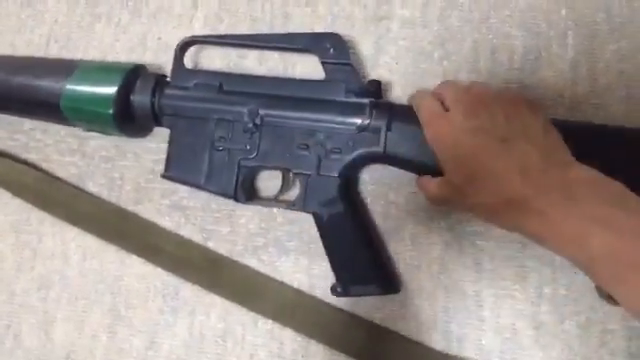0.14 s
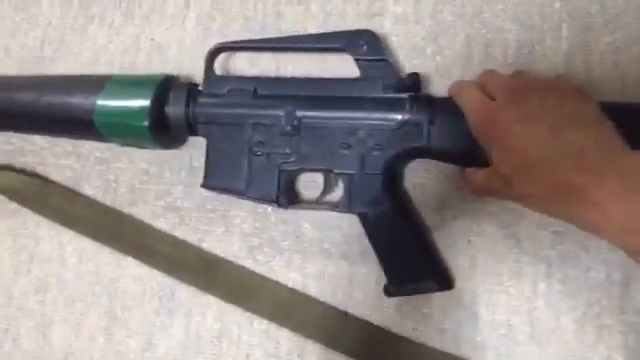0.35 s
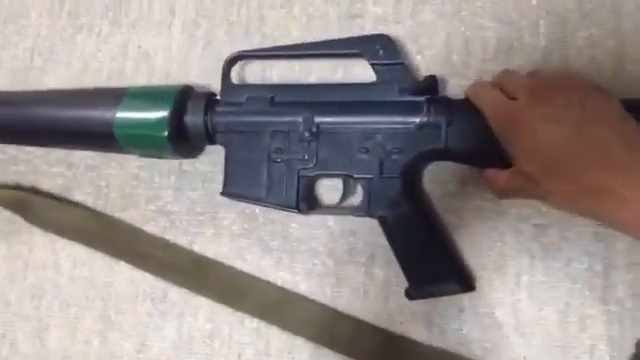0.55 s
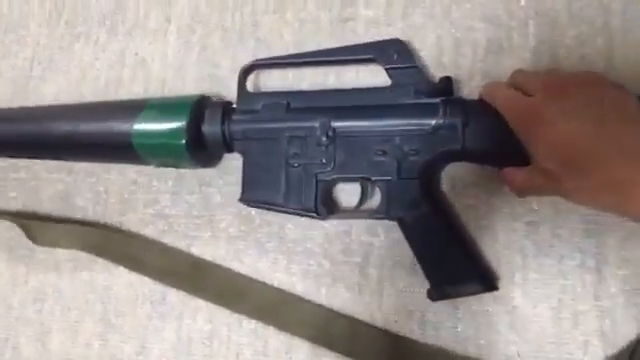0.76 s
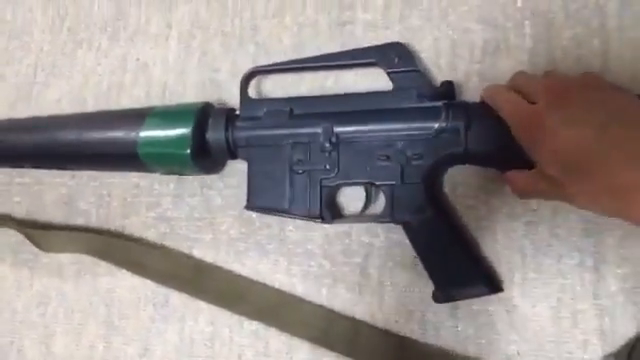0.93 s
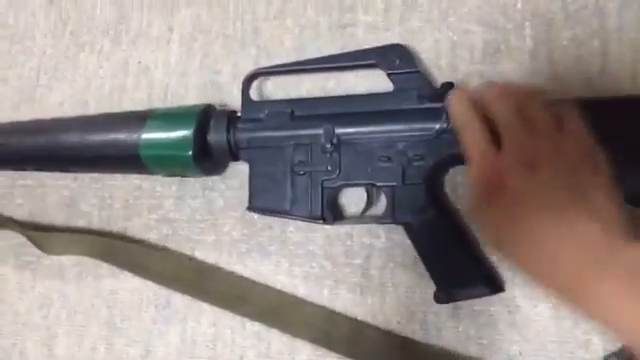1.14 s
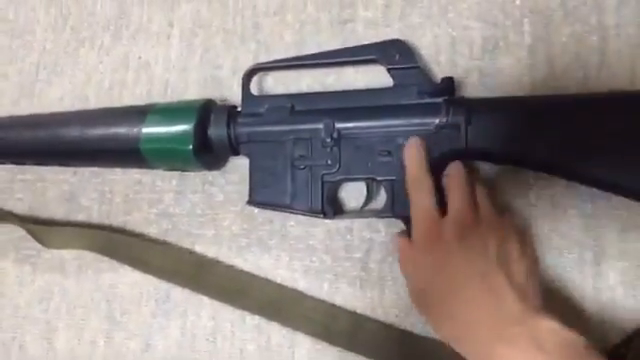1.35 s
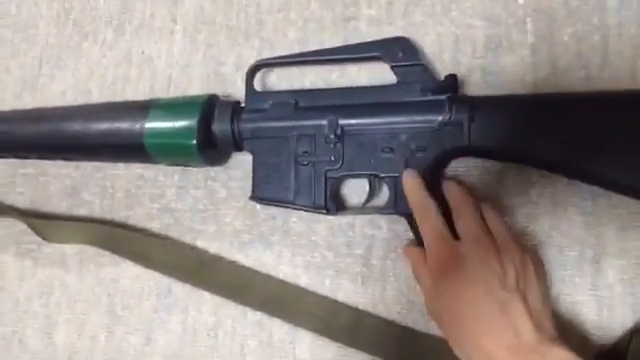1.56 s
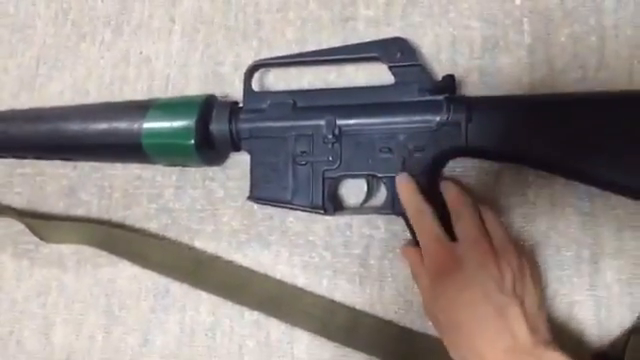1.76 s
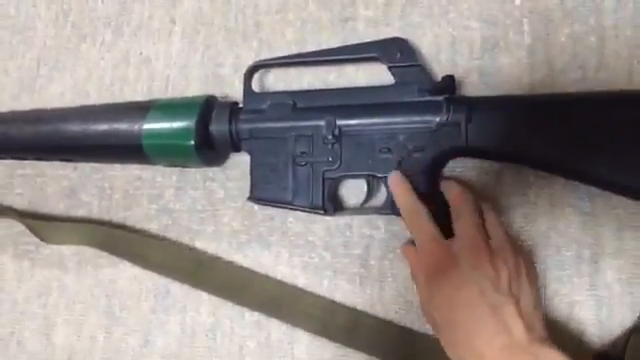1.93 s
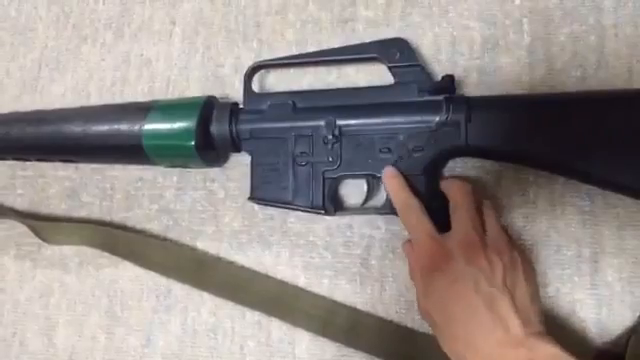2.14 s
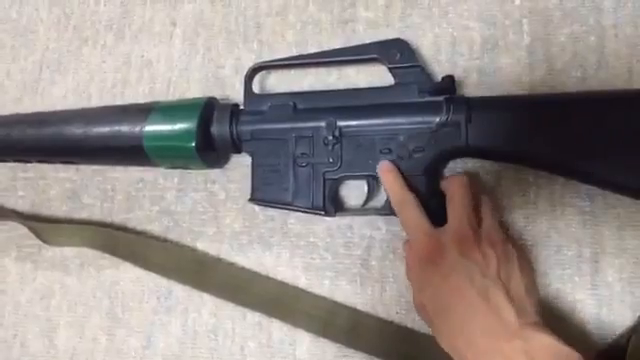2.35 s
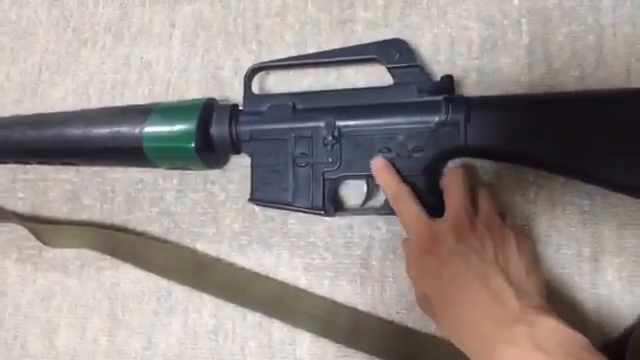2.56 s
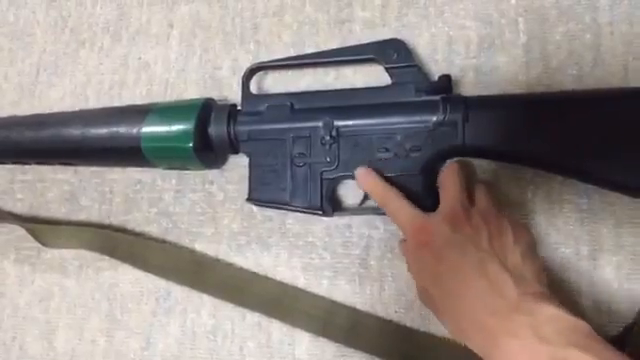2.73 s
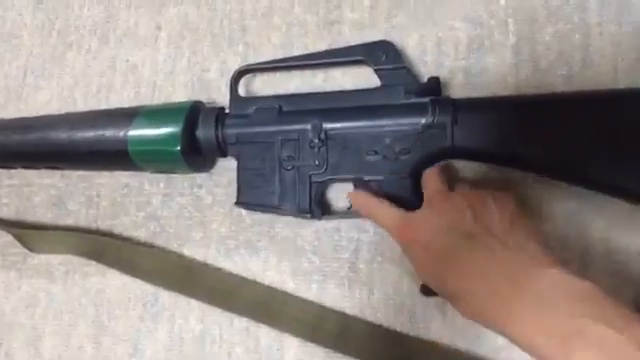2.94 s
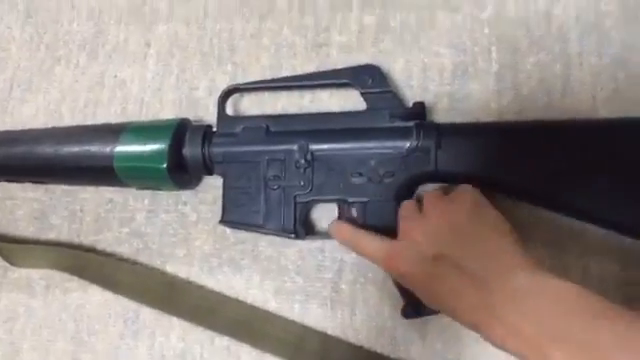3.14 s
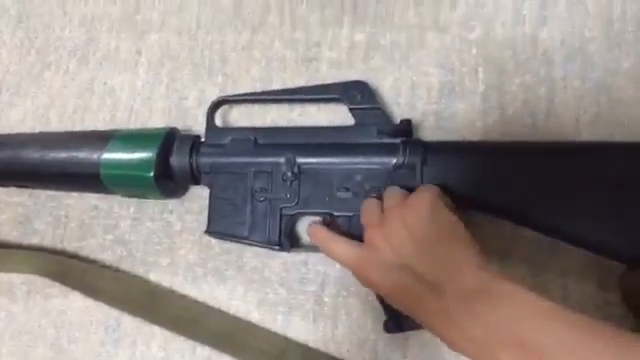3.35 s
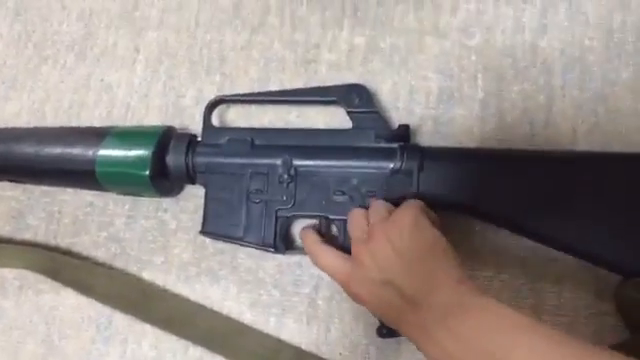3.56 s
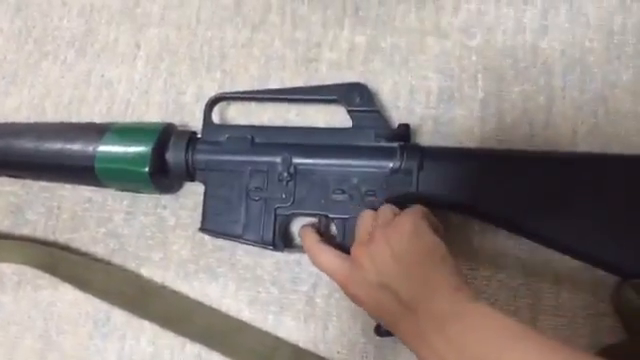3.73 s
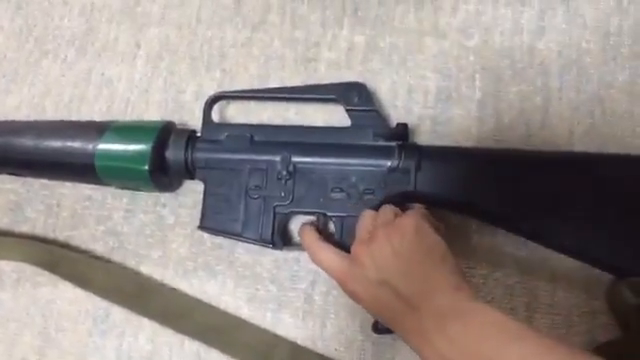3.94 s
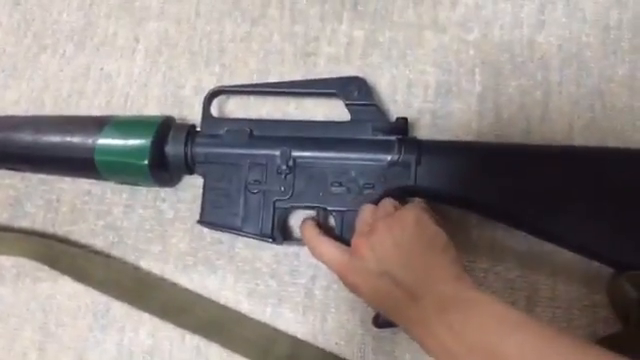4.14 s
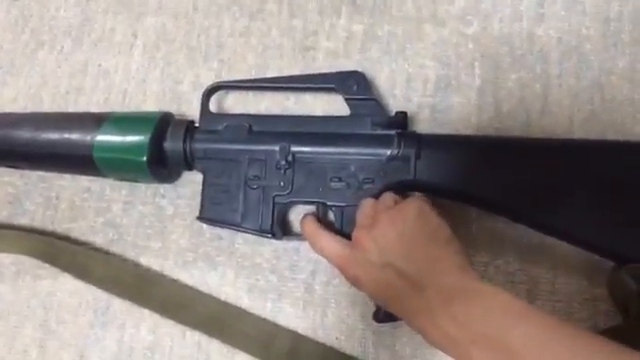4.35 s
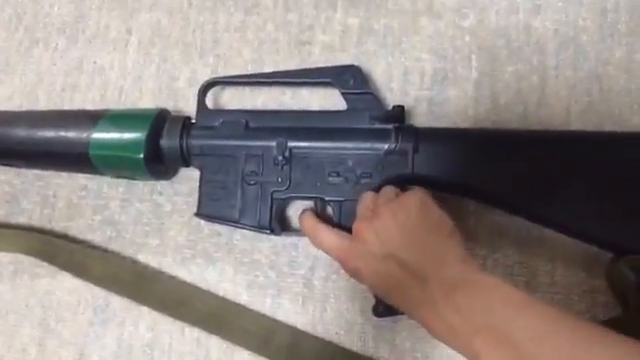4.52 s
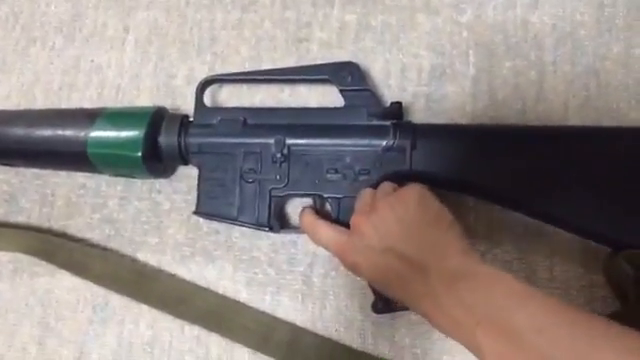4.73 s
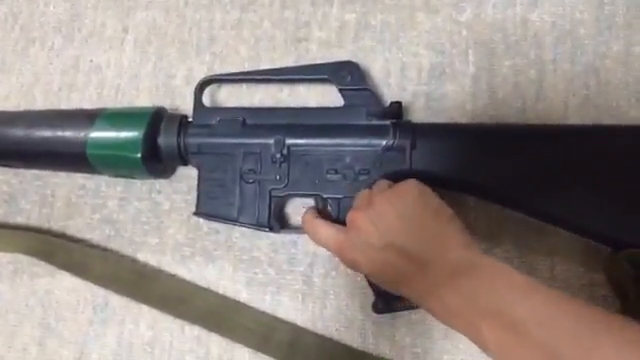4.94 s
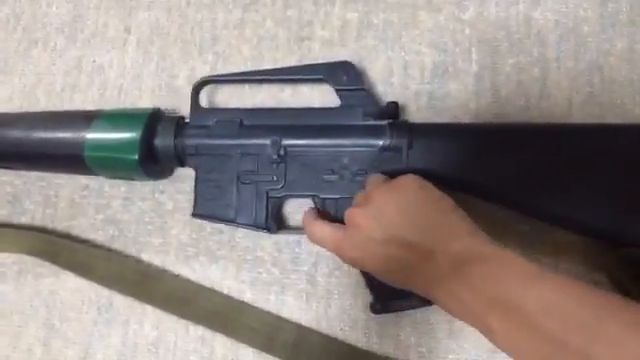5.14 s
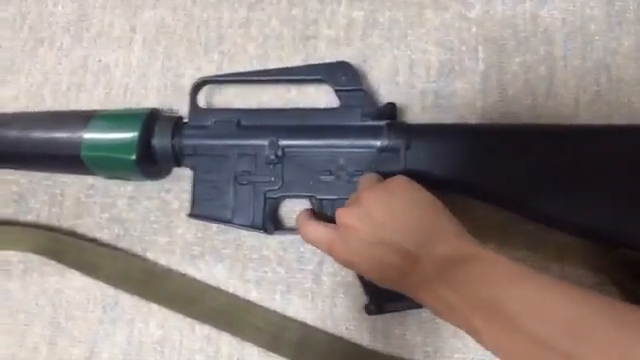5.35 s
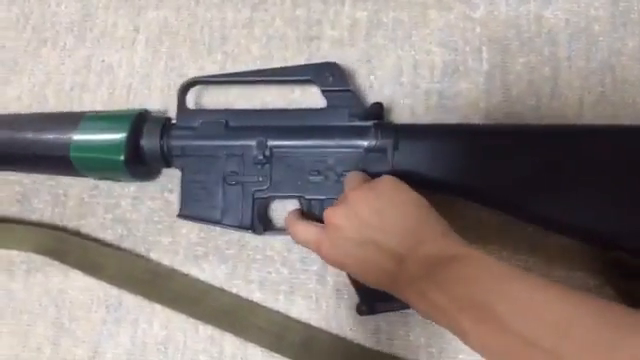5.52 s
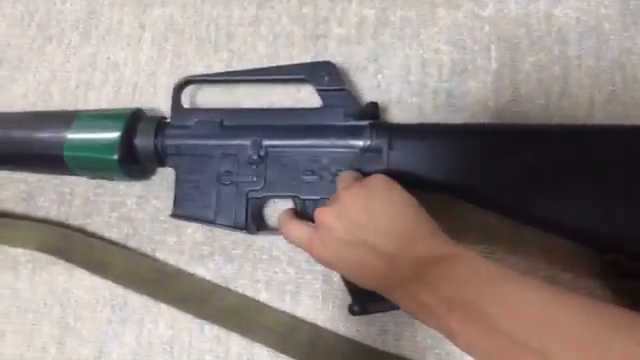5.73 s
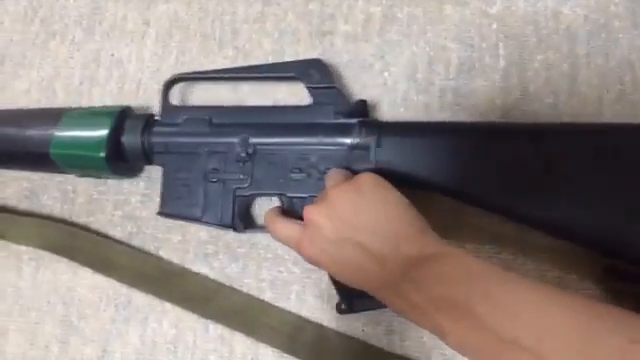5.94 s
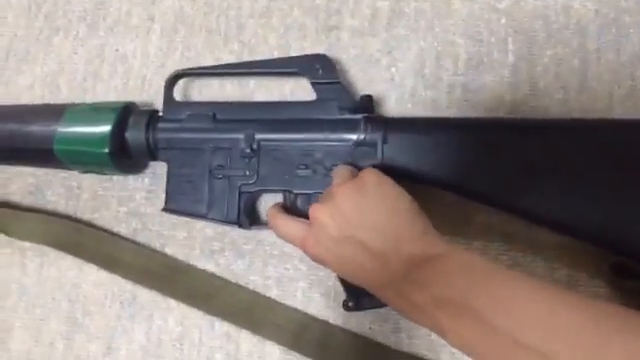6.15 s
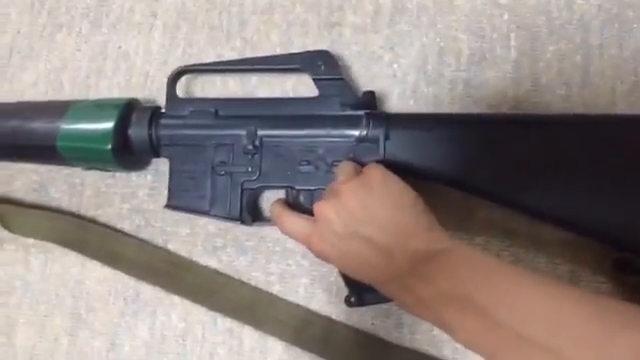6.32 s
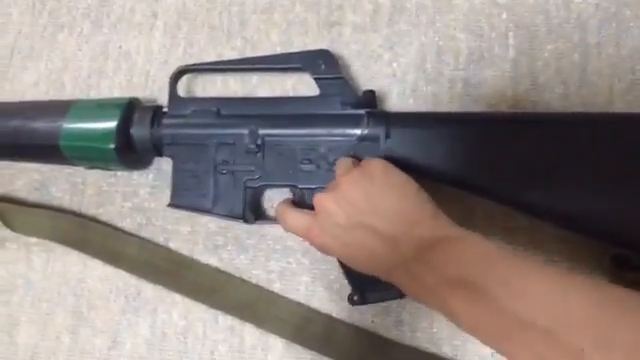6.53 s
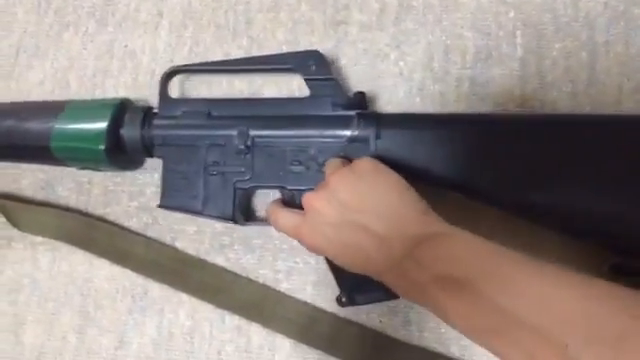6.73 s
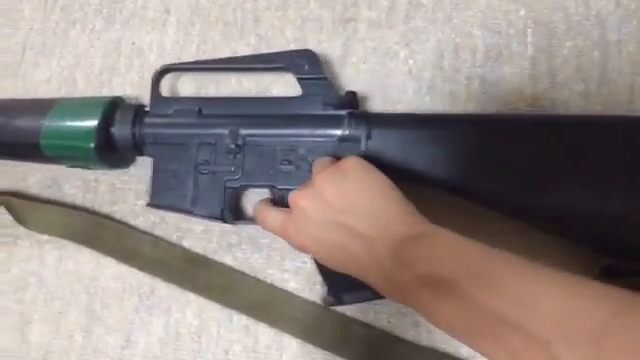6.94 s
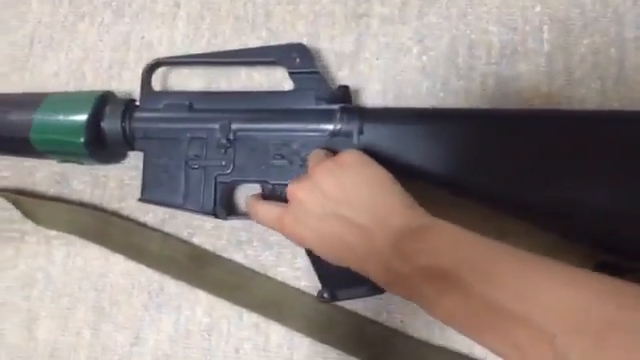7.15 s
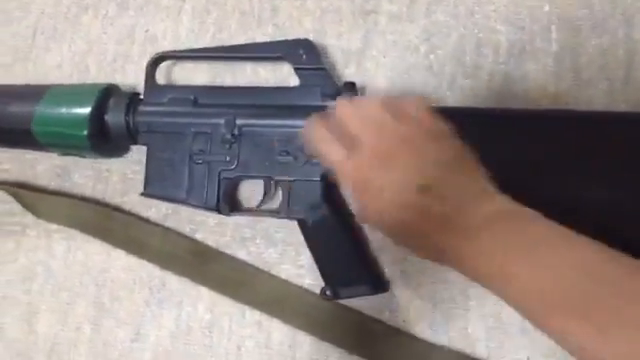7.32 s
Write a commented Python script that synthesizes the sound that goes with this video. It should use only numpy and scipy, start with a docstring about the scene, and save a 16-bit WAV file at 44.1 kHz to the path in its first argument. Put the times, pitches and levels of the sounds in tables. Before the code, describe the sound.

Close by in a small room, a soft rustle and a few light taps come from an airsoft rifle being moved on a rug. A crisp selector click follows, then quiet handling. Two loud full-auto bursts come near the end, a fast mechanical clatter with grinding gears, motor whine and low thumps, split by a short pause in which the spring rings thinly. An appliance hums faintly throughout.

```python
"""First comes a soft rustle: a hand slides an electric airsoft rifle over a rug in a small room.
Fingers tap and brush it, the selector and trigger click, and it fires two bursts, 17 shots a second.
In each firing cycle the piston slams home, the gears knock into a recoil weight, metal clacks and
the motor whines under the load of the spring, which sings on after each burst.
An appliance hums faintly throughout."""
import sys
import numpy as np
from scipy import signal
from scipy.fft import rfft, irfft
from scipy.io import wavfile
from scipy.ndimage import uniform_filter1d

SR = 44100
rng = np.random.default_rng(int(sys.argv[2]) if len(sys.argv) > 2 else 0)


def dump(signal):
    """Clip the signal to [-1, 1] and save it as 16-bit WAV at the path in sys.argv[1]."""
    limited = np.clip(np.atleast_2d(signal).T, -1, 1)
    pcm = np.round(limited * 32767).astype(np.int16)
    wavfile.write(sys.argv[1], SR, pcm)


N = 329868
TIME = np.arange(N) / SR
AGE = TIME[:SR // 4]   # seconds since a blow

# Levels are relative: the functions add their own gains. t60 is the time a sound takes to fade by 60 dB.
# the rifle sliding over the rug: t/s, rub level/dB, rumble level/dB
SLIDE_LEVELS = [(0.0, -68, -61), (0.066, -69, -49), (0.102, -65, -94), (0.126, -60.5, -70),
                (0.296, -53, -42.5), (0.462, -55, -46.5), (0.506, -59, -58), (0.758, -58, -54.5),
                (0.97, -69.5, -77)]
# noise colours (how strong each pitch is) of the rub, the rumble and the room's air: f/Hz, level/dB
RUG_COLOUR = [(180, -36), (300, -7.5), (553, -8.5), (579, -10), (682, 1.5), (1040, -3.5), (1240, 1.5),
              (2900, -9.5), (7770, -12.5), (10600, -20), (13800, -54), (22000, -120)]
RUMBLE_COLOUR = [(15, -44), (25, -42), (48, -1.5), (70, 1), (120, -7.5), (195, -9), (290, -39), (350, -26),
                 (460, -57), (770, -120)]
AIR_COLOUR = [(15, -39.5), (25, -10), (76, 2), (277, -11), (323, -10), (484, -15.5), (578, -8),
              (623, -14.5), (726, -17), (1440, -19.5), (3070, -25.5), (7840, -28), (10600, -31.5),
              (13800, -64), (22000, -120)]
# an appliance humming: f/Hz, level/dB
HUM_TONES = [(585.5, -72.5), (545, -86)]
# fingers tapping the rifle: t/s, level/dB, added treble/dB, added hollow knock/dB
FINGER_TAPS = [(0.055, -44.5, -28, -0.5), (0.981, -43, -31, -13), (1.044, -35.5, -8.5, -10),
               (1.093, -48.5, -21, -3.5), (1.116, -40.5, -19, -10), (1.272, -54.5, 5.5, -21),
               (1.419, -55, 5, -21), (3.392, -47, -37, -4), (4.988, -31, -23.5, -26),
               (7.423, -36.5, -19, -12.5)]
# the hand brushing stock and grip: middle t/s, length/s, level/dB, added treble/dB
HAND_BRUSHES = [(1.034, 0.081, -59, -9), (1.119, 0.081, -60.5, -10), (1.287, 0.041, -72, 2),
                (1.463, 0.45, -76.5, 6), (2.95, 0.27, -74, -16), (3.266, 0.072, -68.5, -9),
                (4.933, 0.024, -64, -10), (6.51, 0.61, -62.5, -8.5)]
# a small metal fitting chinking: t/s, level/dB
FITTING_CHINKS = [(1.092, -71), (1.112, -64)]
# the selector leaving one notch and dropping into the next: t/s, level/dB, tail against the snap/dB
SELECTOR_SNAPS = [(2.4049, -17.5, -23), (2.4233, -21, -31)]
# noise colours of a tap and of the selector: f/Hz, level/dB
TAP_COLOUR = [(100, -3), (400, -16), (800, -10.5), (1300, 4), (2200, -2), (4000, -9.5), (7000, -7),
              (10500, -20.5)]
SELECTOR_COLOUR = [(120, -32), (450, -36), (900, -27), (1600, -37), (1950, -7), (2800, -16), (3200, -4.5),
                   (4400, -7), (5300, 0.5), (7000, -1.5), (9000, -7), (10600, -7.5)]
# modes (natural ringing tones) of the hollow plastic, the fitting and the trigger: f/Hz, level/dB, t60/s
HOLLOW_MODES = [(180, -11.5, 0.057), (379.8, -13.5, 0.027), (574, 0, 0.028), (824, -2, 0.02),
                (991, -0.5, 0.027), (1290, -5.5, 0.045)]
CHINK_MODES = [(5020, 3, 0.1), (5360, -4, 0.18), (10100, -10, .1)]
TRIGGER_MODES = [(1290, 0, .03), (1750, -2, .018), (2480, -5, .035), (2900, -6, .016), (3550, -9, .022)]
# the bursts: motor start t/s, first shot t/s, second shot t/s, first full-speed shot t/s, last shot t/s,
# motor at rest t/s, starting surge/dB, shot body/dB, shot crack/dB, clack/dB, singing spring/dB
BURSTS = [(5.0771, 5.129, 5.1961, 5.259, 6.0257, 6.10, 4.5, -12, -14, -15, 3.5),
          (6.585, 6.6066, 6.672, 6.7407, 7.215, 7.28, -1, -14, -16.5, -14.5, -11)]
# the spring loading the gears (last row: running free): t/s since a shot, tooth f/Hz, whine/dB, grind/dB
GEAR_LOAD = [(0, 3278, -16, -2), (.018, 3640, -6, 0.5), (.032, 3537, -3.5, 1), (.042, 3228, 0, 1),
             (.049, 3099, 1.5, 0.5), (.056, 3027, -5, -3), (.09, 3662, 5, -2)]
# the low thump through the bursts: t/s, level/dB
THUMP_LEVELS = [(5.13, -31), (5.2, -17.5), (5.32, -18.5), (5.5, -25), (5.67, -21.5), (5.735, -8.5),
                (5.91, -28.5), (6.03, -16), (6.61, -21.5), (6.93, -18), (7.1, -39), (7.22, -26)]
# noise colours of the gears, a shot and a clack: f/Hz, level/dB
GEAR_COLOUR = [(120, -13.5), (250, -3), (450, -4.5), (700, -4), (1050, 1), (1500, -0.5), (2100, -1),
               (3200, -1), (4500, -4), (7000, -3.5), (8500, -6.5), (10300, -10.5)]
SHOT_COLOUR = [(120, -10.9), (250, -6), (450, 1.2), (700, 1.7), (1050, 6.5), (1500, -9.5), (2100, -1.5),
               (3200, -8), (4500, -7), (7000, -6.5), (8500, -10), (10300, -21.5)]
CLACK_COLOUR = [(120, -5.5), (250, -11), (450, -11), (700, -3), (1050, 2.1), (1500, -0.5), (2100, -1),
                (3200, -3), (4500, -6.5), (7000, -1), (8500, -4), (10300, -10.5)]
# modes of the rifle's frame under the piston, the weight and the clack: f/Hz, level/dB, t60/s
SHOT_MODES = [(178.4, -17.5, 0.23), (260, -10, .03), (333, -10, .06), (420.4, -8, 0.058), (491, 2.5, .01),
              (600, -23, .1), (768, -14, 0.12), (873, 0.5, 0.0095), (1011, -14.5, 0.14), (1080, -7, 0.058),
              (1307, -14.5, .04), (1830, -12.5, .035), (6810, -14.5, .1), (7490, -14, .03)]
KNOCK_MODES = [(183.5, -7.5, 0.18), (578, -15.5, 0.033), (694, 1, 0.17), (980, -6.5, 0.069),
               (1280.5, -5, 0.045), (1855, -4.5, 0.049), (2425, -9.5, 0.17)]
CLACK_MODES = [(689, -4, .04), (1055, -8, 0.036), (1478, -7.5, 0.036), (2129, -12, 0.035),
               (3210, -15.5, 0.028), (3560, -15, .05), (6150, -14, .06), (6860, -7, 0.011),
               (7240, -12.5, .02)]
# the gears jolting as they start or run back against the latch: t/s, body/dB, crack/dB
GEAR_JOLTS = [(6.058, -19, -15), (6.0705, -21, -18), (6.5835, -22, -22.5), (7.2445, -19, -16)]
# the spring ringing on: f/Hz, level/dB, t60/s
SPRING_MODES = [(1063, -46.5, 2.5), (8468, -62.5, 0.92), (8091, -73, 1.0), (9135, -72.5, .9)]
# how fast the room's echo dies: f/Hz, t60/s
ROOM_DECAY = [(100, .15), (500, 0.22), (2000, 0.23), (6000, 0.21), (10500, 0.18)]


def from_db(db):
    """Turn decibels into a factor to multiply by."""
    return 10 ** (np.asarray(db) / 20)


def along(rows, times):
    """Read a table's columns at any times, joining its rows with straight lines."""
    row_times, *columns = np.transpose(rows)
    return [np.interp(times, row_times, column) for column in columns]


def at_hz(points, hz):
    """Read a table at any frequency, on a scale of octaves."""
    row_hz, values = np.transpose(points)
    return np.interp(np.log(hz + 1), np.log(row_hz), values)


def fade(age, t60):
    """Die away by 60 dB every t60 seconds."""
    return np.exp(-np.log(1000) * age / t60)


def add(out, s, sound):
    """Mix a sound in, starting at s seconds."""
    start = max(round(s * SR), 0)
    out[start:start + len(sound)] += sound[:N - start]


def noise(colour, size=N):
    """Noise of a given colour, with an average power of 1."""
    hz = np.arange(size // 2 + 1) * SR / size
    spectrum = rfft(rng.standard_normal(size)) * from_db(at_hz(colour, hz))
    wave = irfft(spectrum, size)
    return wave / np.sqrt(np.mean(wave ** 2) + 1e-20)


def split(x, edge_hz):
    """Split a sound into its low part and its high part."""
    return [signal.sosfilt(signal.butter(2, edge_hz, kind, fs=SR, output="sos"), x)
            for kind in ("low", "high")]


def ring(modes, vary_db, detune):
    """A struck object rings in fading tones, a little different in strength and tuning each time."""
    hz, db, t60 = np.transpose(modes)[:, :, None]
    strength, tuning = rng.standard_normal((2, len(modes), 1))
    signs = (-1) ** np.arange(len(modes))[:, None]
    waves = signs * np.sin(2 * np.pi * hz * (1 + detune * tuning) * AGE)
    return np.sum(from_db(db + vary_db * strength) * fade(AGE, t60) * waves, axis=0)


def rug_slide():
    """The rifle rubs and rumbles over the rug, then comes to rest."""
    rub_db, rumble_db = along(SLIDE_LEVELS, TIME)
    moving = np.clip((SLIDE_LEVELS[-1][0] - TIME) / 0.07, 0, 1)
    rub = from_db(rub_db - 1) * noise(RUG_COLOUR)
    rumble = from_db(rumble_db + 0.5) * noise(RUMBLE_COLOUR)
    return moving * (rub + rumble)


def hum_and_air():
    """An appliance hums over the faint hiss of the room."""
    hum = sum(from_db(db) * np.sqrt(2) * np.sin(2 * np.pi * hz * TIME) for hz, db in HUM_TONES)
    return hum + from_db(-67) * noise(AIR_COLOUR)


def finger_taps():
    """A finger makes a dull tap and a bright tick, and the hollow plastic rings."""
    out = np.zeros(N)
    for s, db, treble_db, knock_db in FINGER_TAPS:
        body, tick = split(noise(TAP_COLOUR, len(AGE)) * fade(AGE, t60=0.026), edge_hz=2500)
        hollow = from_db(knock_db + 6.5) * ring(HOLLOW_MODES, vary_db=5, detune=0.058)
        add(out, s, from_db(db - 11) * (body + hollow - from_db(treble_db + 5.5) * tick))
    return out


def hand_brushes():
    """The hand rubs over the rifle; each stroke swells and fades."""
    out = np.zeros(N)
    dull, bright = split(noise(RUG_COLOUR), edge_hz=2500)
    for s, length_s, db, treble_db in HAND_BRUSHES:
        swell = np.cos(np.pi * np.clip((TIME - s) / length_s, -.5, .5))
        out += from_db(db) * swell * (dull - from_db(treble_db) * bright)
    return out


def fitting_chinks():
    """A small metal fitting rings with a few high tones."""
    out = np.zeros(N)
    for s, db in FITTING_CHINKS:
        add(out, s, from_db(db) * ring(CHINK_MODES, vary_db=2, detune=0.011))
    return out


def selector_clicks():
    """The selector lever jumps between notches: sharp snaps, each with a faint tail."""
    out = np.zeros(N)
    for s, db, tail_db in SELECTOR_SNAPS:
        snap = fade(AGE, t60=0.015) + from_db(tail_db) * fade(AGE, t60=0.1)
        add(out, s, from_db(db - 7.5) * noise(SELECTOR_COLOUR, len(AGE)) * snap)
    return out


def trigger_click(s=4.987):
    """The small steel trigger snaps over and rings just before the first burst."""
    out = np.zeros(N)
    add(out, s, from_db(-43.5) * ring(TRIGGER_MODES, vary_db=2, detune=.005))
    return out


def motor_run(start_speed=.55, spin_up_s=.013, coast_s=.075, surge_s=.037, surge_width_s=.014):
    """The motor's speed (1 is full) and loudness: it labours to wind the spring, runs, then coasts."""
    speed, surge_db = np.zeros(N), np.zeros(N)
    for start_s, _, _, _, _, rest_s, db, *_ in BURSTS:
        age = np.maximum(TIME - start_s, 0)
        rising = (age > 0) * (1 - (1 - start_speed) * np.exp(-age / spin_up_s))
        coasting = np.sqrt(np.clip((rest_s - TIME) / coast_s, 0, 1))
        speed += rising * coasting
        surge_db += db * np.exp(-((age - surge_s) / surge_width_s) ** 2)
    return speed, speed ** 3.2 * from_db(surge_db)


def gears(shots, wobble=0.026, grain_db=1.5):
    """Gear teeth grind and whine; the pitch sags as the spring is wound for the next shot."""
    speed, loudness = motor_run()
    shot_s = np.array(shots)[:, 0]
    latest_shot = np.maximum(np.searchsorted(shot_s, TIME) - 1, 0)
    since_shot = TIME - shot_s[latest_shot]
    since_shot[TIME < shot_s[0]] = GEAR_LOAD[-1][0]   # no shot yet: the load is even
    tooth_hz, whine_db, grind_db = along(GEAR_LOAD, since_shot)
    flutter = [(20, -1), (300, 0.0), (1200, -25.5), (5000, -67.5)]   # f/Hz, level/dB
    phase = 2 * np.pi * np.cumsum(tooth_hz * speed * (1 + wobble * noise(flutter))) / SR
    tones = np.sin(phase) + from_db(-8) * np.sin(2 * phase) + from_db(-9) * np.sin(phase / 2)
    whine = from_db(whine_db - 24.5) * speed ** 2 * tones
    grind = from_db(grind_db - 17.5) * split(noise(GEAR_COLOUR), edge_hz=300)[1]
    grain = from_db(grain_db * noise(flutter))   # no two teeth meet equally hard
    return loudness * grain * (grind + whine)


def firing_cycles(cycle_s=.0589, last_late_s=.0022, scatter_db=1.22, jitter_s=.0004):
    """List the blows: each cycle is a shot, a knock and a clack, and no two cycles are alike."""
    shots = []    # t/s, body/dB, crack/dB, thump/dB
    knocks = []   # t/s, level/dB
    clacks = []   # t/s, body/dB, crack/dB
    for _, first_s, second_s, full_s, last_s, _, _, body_db, crack_db, clack_db, _ in BURSTS:
        count = round((last_s - full_s) / cycle_s)
        steady_s = np.linspace(full_s, last_s - last_late_s, count, endpoint=False)
        s = np.r_[first_s, second_s, steady_s, last_s]
        gap_s = np.diff(s, append=last_s)
        first, last = s == first_s, s == last_s
        body, crack, thump, knock, clack, snap, knock_lag, clack_lag = rng.standard_normal((len(s), 8)).T
        shots += zip(s,
                     body_db - 4.5 * last + scatter_db * body,   # the power is off for the last shot
                     crack_db - 6.5 * first + scatter_db * crack,   # the first cycle is gentler
                     along(THUMP_LEVELS, s)[0] + 4 * thump)
        knock_s = s + .283 * gap_s + jitter_s * knock_lag
        clack_s = s + .464 * gap_s + jitter_s * clack_lag
        # no knock follows the last shot; its clack sounds as the gears stop (GEAR_JOLTS)
        knocks += zip(knock_s[:-1], -10.5 - 4.5 * first + scatter_db * knock)
        clacks += zip(clack_s[:-1],
                      clack_db + scatter_db * clack,
                      clack_db + 2.5 - 5.5 * first + scatter_db * snap)
    return shots, knocks, clacks


def recoil_thumps(shots):
    """Each shot kicks the rifle against the rug: two low tones that die at once."""
    out = np.zeros(N)
    modes = [(71.8, 0, .04), (190, -5, .028)]   # f/Hz, level/dB, t60/s
    for s, _, _, db in shots:
        add(out, s - .001, from_db(db + 6) * ring(modes, vary_db=2, detune=0.14))
    return split(out, edge_hz=45)[1]


def crash(colour, own_ring, alike, t60, bite_db=0):
    """Crowded tones blur into noise with a hard start; the share `alike` repeats on every blow."""
    wave = np.sqrt(alike) * own_ring + np.sqrt(1 - alike) * noise(colour, len(AGE))
    loudness = fade(AGE, t60) + from_db(bite_db) * fade(AGE, t60=0.018)
    return split(wave * loudness, edge_hz=360)[1]


def metal_blows(rows, modes, colour, modes_db, body_db, crack_db, t60, alike, bite_db):
    """Metal strikes metal: clear tones under a crash with a low body and a high crack."""
    out, own_ring = np.zeros(N), noise(colour, len(AGE))
    for s, level_db, treble_db, *_ in rows:
        body, crack = split(crash(colour, own_ring, alike, t60, bite_db), edge_hz=2950)
        clear = from_db(modes_db) * ring(modes, vary_db=4, detune=0.00088)
        blow = from_db(level_db) * (clear + from_db(body_db) * body)
        add(out, s, blow - from_db(treble_db + crack_db) * crack)
    return out


def piston_slams(shots):
    """The piston slams home and sets the rifle's frame ringing."""
    return metal_blows(shots, SHOT_MODES, SHOT_COLOUR, modes_db=2, body_db=-3.5, crack_db=5,
                       t60=0.054, alike=0.078, bite_db=-2)


def piston_bounces(shots, delay_s=.0055):
    """The piston bounces once after each shot, with a mid-pitched rattle."""
    # f/Hz, level/dB
    colour = [(300, -31.5), (850, -22.5), (1150, -1), (1400, 4.5), (2200, 1), (3500, -11.5),
              (10000, -18.5)]
    out, own_ring = np.zeros(N), noise(colour, len(AGE))
    for s, db, *_ in shots:
        add(out, s + delay_s, from_db(db - 6) * crash(colour, own_ring, alike=.3, t60=0.11))
    return out


def weight_knocks(knocks, contact_s=.0058):
    """Teeth scrape as they catch the weight; the frame swings hard during contact, then rings weakly."""
    out = np.zeros(N)
    contact = from_db(-15) + 1 / (1 + (AGE / contact_s) ** 20)
    for s, db in knocks:
        add(out, s, from_db(db + 1) * contact * ring(KNOCK_MODES, vary_db=1.5, detune=0.0075))
        scrape = noise(CLACK_COLOUR, len(AGE)) * fade(AGE, t60=0.067)
        add(out, s - .001, from_db(db - 3) * scrape)
    return split(out, edge_hz=120)[1]


def metal_clacks(clacks):
    """Metal clacks near the middle of each cycle and whenever the gears jolt."""
    return metal_blows(clacks + GEAR_JOLTS, CLACK_MODES, CLACK_COLOUR, modes_db=2.5, body_db=4.5,
                       crack_db=1.5, t60=0.033, alike=0.091, bite_db=-5)


def singing_spring():
    """The last shot of a burst leaves the spring ringing."""
    out = np.zeros(N)
    song = sum(from_db(db) * fade(TIME, t60) * np.sin(2 * np.pi * hz * TIME)
               for hz, db, t60 in SPRING_MODES)
    for _, _, _, _, last_s, *_, db in BURSTS:
        add(out, last_s, from_db(db) * song)
    return out


def room(x, echo_db, delay_s):
    """Add the room's echo, which starts after a short delay and dies away octave by octave."""
    age = TIME[:SR // 2]
    rest, tail = rng.standard_normal(len(age)), 0
    for hz in 200 * 2. ** np.arange(6):
        band, rest = split(rest, hz)
        tail = tail + band * fade(age, at_hz(ROOM_DECAY, hz))
        rest = -rest   # keeps neighbouring bands from cancelling
    tail = (tail + rest * fade(age, ROOM_DECAY[-1][1])) * (age > delay_s)
    tail = split(tail, edge_hz=280)[1]   # the low thump gets almost no echo
    tail /= np.sqrt(np.sum(tail ** 2))
    return x + from_db(echo_db) * signal.fftconvolve(x, tail)[:N]


def gain_control(x, limit_db, release_db_per_s):
    """Loud sound turns the volume down at once; it creeps back slowly."""
    level_db = 10 * np.log10(np.abs(uniform_filter1d(x ** 2, size=SR // 17)) + 1e-12)
    excess_db = np.maximum(level_db - limit_db, 0)
    recovery_db = release_db_per_s * TIME
    cut_db = np.maximum.accumulate(excess_db + recovery_db, axis=-1) - recovery_db
    return x * from_db(-cut_db)


def scene():
    """The hand and the rifle in the room, over a hum and still air."""
    shots, knocks, clacks = firing_cycles()
    hand = (rug_slide() + finger_taps() + hand_brushes() + fitting_chinks()
            + selector_clicks() + trigger_click())
    rifle = (gears(shots) + recoil_thumps(shots) + piston_slams(shots) + piston_bounces(shots)
             + weight_knocks(knocks) + metal_clacks(clacks))
    in_room = room(hand + from_db(3.5) * rifle, echo_db=-14, delay_s=0.0099)
    return (in_room + singing_spring() + hum_and_air())[None]


def record(dry):
    """The volume dips under the bursts, the loudest peaks are rounded and the highest treble is cut."""
    ceiling, cutoff_hz = .97, 10600
    levelled = gain_control(dry, limit_db=-11.5, release_db_per_s=2)
    rounded = ceiling * np.tanh(levelled / ceiling)
    return signal.sosfilt(signal.ellip(12, .2, 80, cutoff_hz, fs=SR, output="sos"), rounded)


dry = scene()
out = record(dry)
dump(out)
```